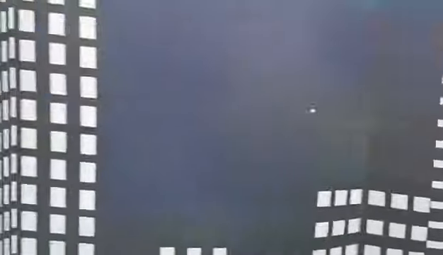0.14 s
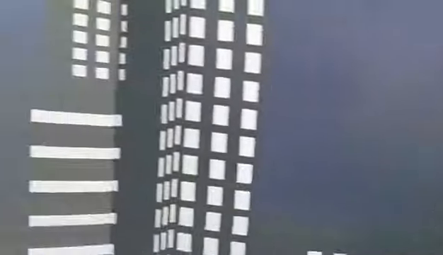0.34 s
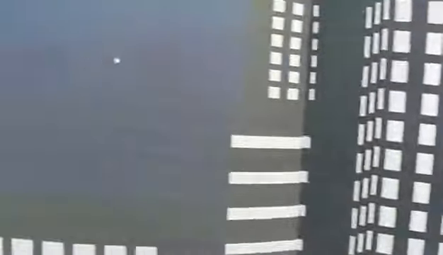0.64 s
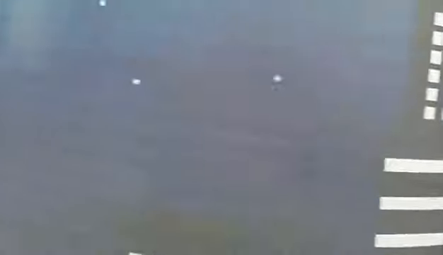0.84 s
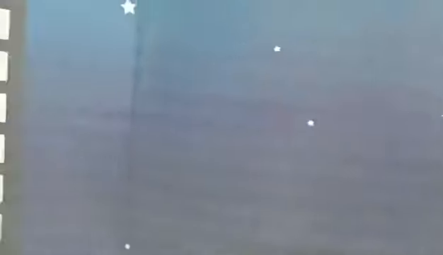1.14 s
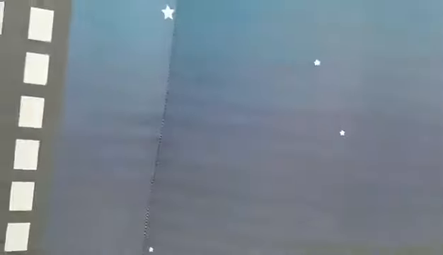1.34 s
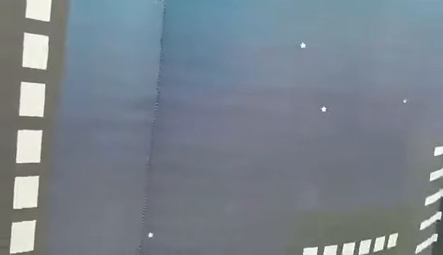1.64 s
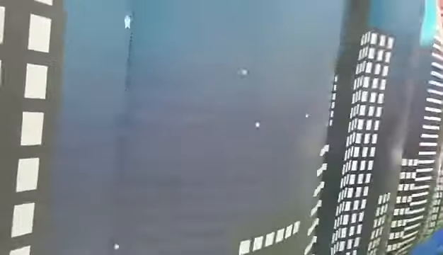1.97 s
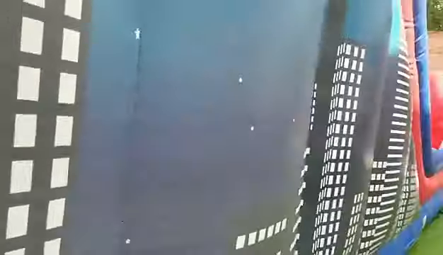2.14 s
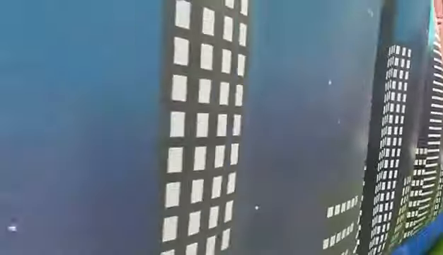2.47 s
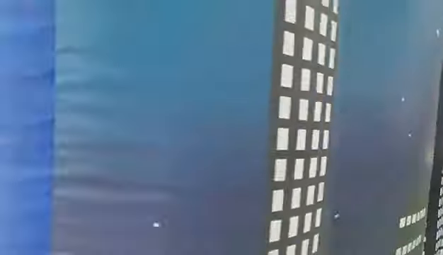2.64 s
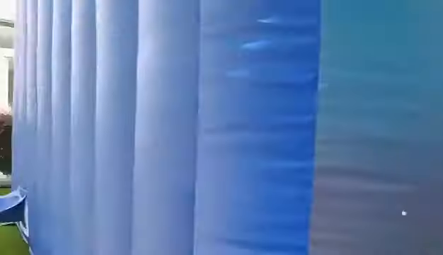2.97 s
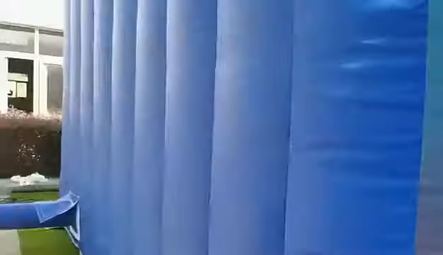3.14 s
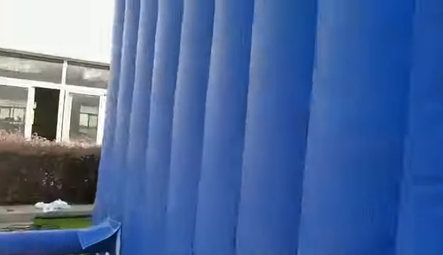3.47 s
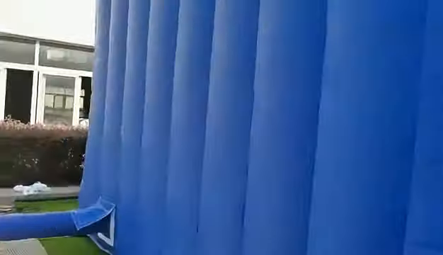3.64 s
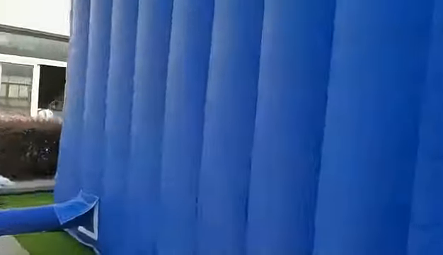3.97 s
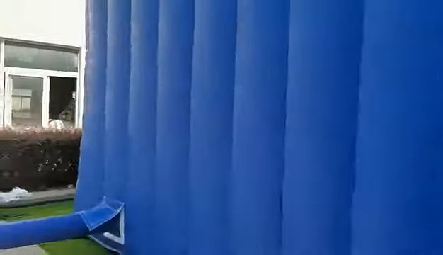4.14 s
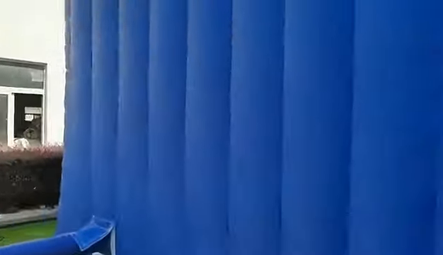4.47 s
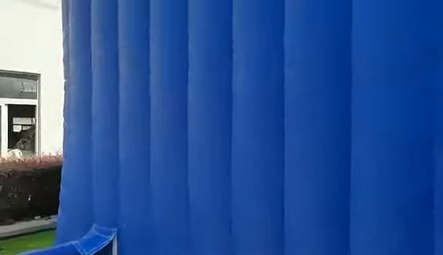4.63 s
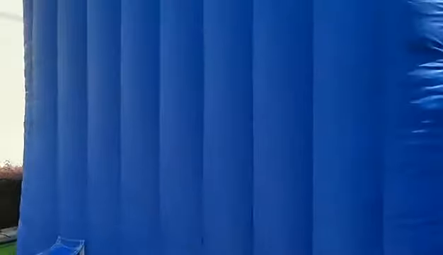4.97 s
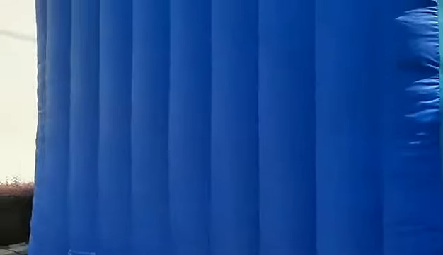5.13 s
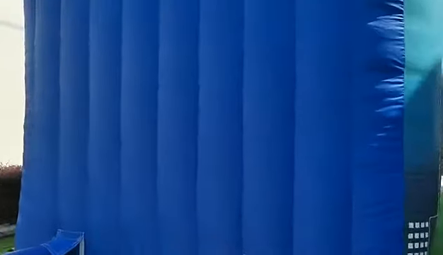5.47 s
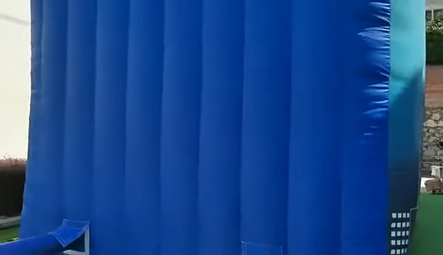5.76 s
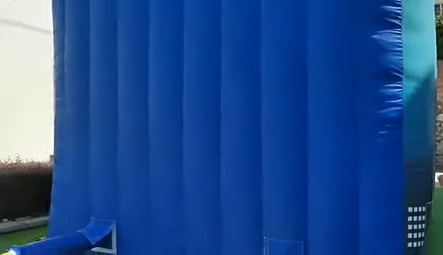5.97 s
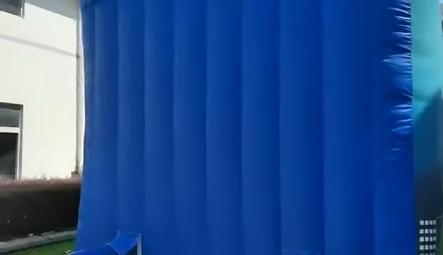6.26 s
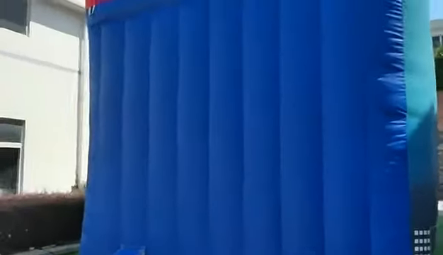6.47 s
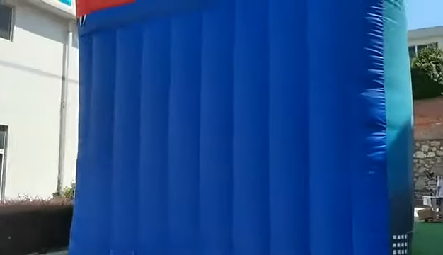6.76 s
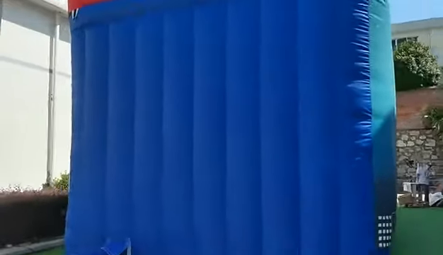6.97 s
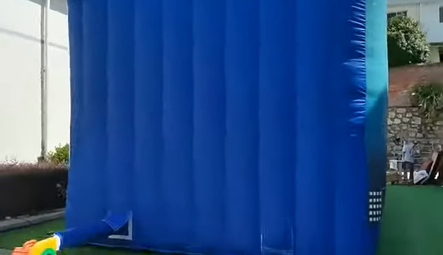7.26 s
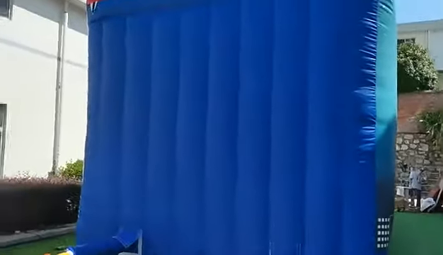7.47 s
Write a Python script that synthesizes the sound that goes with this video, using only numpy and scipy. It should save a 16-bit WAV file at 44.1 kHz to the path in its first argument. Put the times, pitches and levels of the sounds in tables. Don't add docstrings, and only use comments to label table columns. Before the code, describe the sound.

An electric air blower rushes steadily outdoors beside a big inflatable, dull at first, then brighter and hissier, with wind bumping the microphone.

```python
import sys
import numpy as np
from scipy import signal
from scipy.io import wavfile
from scipy.ndimage import map_coordinates

SR = 44100
rng = np.random.default_rng(int(sys.argv[2]) if len(sys.argv) > 2 else 0)


def dump(signal):
    limited = np.clip(np.atleast_2d(signal).T, -1, 1)
    pcm = np.round(limited * 32767).astype(np.int16)
    wavfile.write(sys.argv[1], SR, pcm)


def amplitude_ratio(level_db):
    exponent = np.asarray(level_db, float) / 20
    return 10 ** exponent


N = 335160
STEPS_S = np.arange(1600) / 200

# Hz, hidden 0-1, in sight 0-1.
DIRECT_SHARE = [(108, 0.9, 0.95), (383, 0.93, 0.96), (560, 0.5, 0.75), (820, .85, .7), (1106, 0.5, 0.3),
                (1852, 0.3, 0.8), (2250, .2, 0.8), (3040, .2, .65), (4580, 0.2, 0.15), (7300, 0.03, 0.2)]
LEAD_FROM_HZ = 960
PATCHY_TO_HZ = 2800


def blower(patchy_db, flutter_db):
    s, *_, lead_ms = walk()
    lead_ms = in_time(s, lead_ms)
    edges = np.r_[25 * 2 ** np.arange(0, 3, 1 / 2), 200 * 2 ** np.arange(0, 5.3, 1 / 8)]
    hz, width = np.sqrt(edges[1:] * edges[:-1]), np.diff(edges)
    levels_db, sight = band_levels(hz, width)
    sight = in_time(s, sight)
    share = np.clip(at_hz(DIRECT_SHARE, hz), 0, 1)
    direct_gain, scatter_gain = np.sqrt(share), np.sqrt(1 - share)

    source, scatter = rng.standard_normal((2, N)), rng.standard_normal((2, 2, N))
    arrivals = [np.array([x, delayed(x, lead_ms)]) for x in source]

    patches = drift(0.79, count=2 * len(hz))
    flutter = drift(24.3, count=len(hz))
    surge = drift(5.4, count=1)[0]
    out = np.zeros((2, N))
    for k in range(len(hz)):
        short_wave = hz[k] > LEAD_FROM_HZ
        first = arrivals[k % 2] if short_wave else source[k % 2]
        hidden, seen = direct_gain[:, k]
        hidden_rest, seen_rest = scatter_gain[:, k]
        air = (hidden + (seen - hidden) * sight) * first
        air = air + (hidden_rest + (seen_rest - hidden_rest) * sight) * scatter[k % 2]
        band = bandpass(air, edges[k], edges[k + 1])
        patch_db = patchy_db * min(1, PATCHY_TO_HZ / hz[k])
        for port in (0, 1):
            wobble_db = patch_db * patches[2 * k + port * short_wave]
            wobble_db = wobble_db + flutter_db * (flutter[k] + 0.18 * surge)
            gain = amplitude_ratio(np.interp(STEPS_S, s, levels_db[port, k]) + wobble_db)
            out[port] += in_time(STEPS_S, gain) * band[port]
    return out * np.sqrt(SR / 2 / 1.11), sight, lead_ms


# time in s, nearness to the blower in dB, boom off the fabric wall in dB,
# left port turned towards the blower in dB, left lead in ms.
WALK_PATH = [(0, -4.5, 2.5, -6, 0.05), (.5, -4, 3, -2, 0.13), (.9, -3.5, -2.5, -5, 0.23),
             (1.4, -1.5, 0.5, -4.5, 0.62), (1.9, -2.5, 0, -1.5, 0.54), (2.4, -2.5, -2.5, -2, .43),
             (2.85, -2, 5, -0.5, 0.4), (3.25, -1, 1, 0, 0.36), (3.9, 0, 4, -1, 0.34),
             (4.4, 1, -1.5, 3.5, 0.35), (4.9, 1.5, -1, -1.5, 0.32), (5.4, 0, -1, -0.5, 0.36),
             (5.8, -2.5, 0.5, 1.5, 0.3), (6.3, -2, -1, -0.5, 0.28), (6.8, -5.5, 3, 4, .29),
             (7.25, -5, -0.5, -2.5, 0.29), (7.6, -6, 1, 3.5, 0.29)]


def walk():
    s = np.arange(0, N / SR + .1, .05)
    return s, *along(WALK_PATH, s)


CORNER_S, CORNER_TAKES_S = 1.596, 0.68
LATER_S_PER_OCTAVE, FIRST_HZ = 0.17, 5950


def in_sight(s, hz):
    corner_s = CORNER_S + LATER_S_PER_OCTAVE * np.clip(np.log2(FIRST_HZ / hz), 0, 2)
    return np.sin(np.pi / 2 * np.clip((s - corner_s) / CORNER_TAKES_S + .5, 0, 1)) ** 2


# Hz, hidden left, hidden right, in sight left, in sight right in dB.
PORT_COLOUR = [(24, -23, -36, -23.5, -36), (64.7, -4.5, -11.5, -5.5, -11), (281.6, 2.5, -3.5, -2, -1.5),
               (465.6, -25, -30.5, -16, -18), (753, -25, -21, -16.5, -17), (1090, -14.5, -11.5, -14.5, -13),
               (1543, -18.5, -12.5, -9, -9.5), (2208, -19.5, -9.5, -10.5, -6), (2685, -20, -34, -13, -16),
               (3524, -35.5, -35.5, -17, -21.5), (4158, -24, -20, -14, -14),
               (5424, -36.5, -28.5, -21.5, -17.5), (6965, -28, -26, -13, -13), (7426, -35.5, -32, -20, -21)]
# time in s, ridge in Hz, ridge in dB, top in dB.
PHONE_TILT = [(0, 2180, -1.5, -3.5), (1.3, 2270, 1, -1), (1.9, 2260, -2.5, 2.5), (2.5, 2070, 3.5, 0.5),
              (4.1, 2180, 4, -3.5), (4.8, 2147, 3, 0.5), (5.6, 2196, 8, 3.5), (7.2, 2313, 2.5, 2.5),
              (7.5, 2420, 1, 0)]
RIDGE_WIDTH_HZ, RIDGE_LEFT_SHARE = 110, 0.48
TOP_FROM_HZ, TOP_RIGHT_SHARE = 5400, 0.46
NOTCH_HZ, NOTCH_HZ_PER_DB, NOTCH_WIDTH_HZ, NOTCH_DB = 4750, 86.5, 200, -7.5
# time in s, centre in Hz, left in dB, right in dB.
GROUND_ECHO_DIP = [(0, 560, 2.5, -1.5), (1, 645, -1, 0), (1.7, 798, 1.5, -9.5), (2.3, 708, 0.5, -6),
                   (3, 655, 2.5, -8.5), (3.6, 728, -1, -8), (4.2, 765, -3.5, -7.5), (5.3, 820, -7, 1),
                   (6.2, 853, -2.5, -1), (7, 880, -4, -4.5), (7.6, 790, -0.5, -3)]
# time in s, centre in Hz, left in dB, right in dB.
WALL_ECHO_DIP = [(0, 1250, -3, -3), (1.1, 1033, -7.5, 2), (2.3, 1276, -3.5, -3.5), (3.4, 1392, 0.5, -2.5),
                 (4.4, 1246, -1, -3), (5.1, 1080, -0.5, -8.5), (5.9, 1445, -4, -1), (6.5, 1153, 1, -7),
                 (7.6, 1150, -1, -3.5)]
# time in s, duration in s, from Hz, to Hz, level in dB.
RIGHT_SHADE = (3.5, 4.5, 4396, 5702, -7)
# time in s, duration in s, from Hz, to Hz, level in dB.
LAST_SWING = (7.36, 0.084, 2200, 5500, 6)
RUSH_EDGES_HZ = [25, 420, 1500, 2900, 7800]
# hidden in dB, in sight in dB, share of nearness, share of boom (0-1).
RUSH_PARTS = [
    (-32, -29.5, .6, 0.87),
    (-37, -34, .25, .5),
    (-31.5, -26, 0.9, 0.077),
    (-41.5, -29.5, 0.46, 0.021),
]
# hidden in dB, in sight in dB, share of turning (0-1).
RUSH_BALANCES = [
    (2.2, 2.5, 0.035),
    (-1.2, -0.6, 0.037),
    (-2, -3.5, 0.79),
    (-2.5, 0.5, 0.48),
]


def band_levels(hz, width):
    s, near_db, boom_db, turning_db, _ = walk()
    rows = hz[:, None]
    sight = in_sight(s, rows)
    colour = at_hz(PORT_COLOUR, hz)[..., None]
    shape = colour[:2] * (1 - sight) + colour[2:] * sight

    ridge_hz, ridge_db, top_db = along(PHONE_TILT, s)
    ridge_bell = np.exp(-.5 * ((rows - ridge_hz) / RIDGE_WIDTH_HZ) ** 2)
    shape += np.outer([RIDGE_LEFT_SHARE, 1], ridge_db)[:, None] * ridge_bell
    shape += np.outer([1, TOP_RIGHT_SHARE], top_db)[:, None] / (1 + (TOP_FROM_HZ / rows) ** 20)
    notch_hz = NOTCH_HZ + NOTCH_HZ_PER_DB * top_db
    shape[1] += NOTCH_DB * np.exp(-.5 * ((rows - notch_hz) / NOTCH_WIDTH_HZ) ** 2)
    shape += sliding_dip(GROUND_ECHO_DIP, s, hz) + sliding_dip(WALL_ECHO_DIP, s, hz)
    shape[1] += opening(RIGHT_SHADE, s, hz)

    for part, balance, low, high in zip(RUSH_PARTS, RUSH_BALANCES, RUSH_EDGES_HZ, RUSH_EDGES_HZ[1:]):
        seen = in_sight(s, np.sqrt(low * high))
        level_db = part[0] * (1 - seen) + part[1] * seen + part[2] * near_db + part[3] * boom_db
        pan_db = balance[0] * (1 - seen) + balance[1] * seen + balance[2] * turning_db
        inside = (hz > low) & (hz <= high)
        power = np.sum(amplitude_ratio(shape[:, inside]) ** 2 * width[inside, None], axis=1)
        left_db = level_db + 10 * np.log10(2 / (1 + amplitude_ratio(-pan_db) ** 2))
        shape[:, inside] += (np.array([left_db, left_db - pan_db]) - 10 * np.log10(power))[:, None]
    shape[1] += opening(LAST_SWING, s, hz)
    shape += crests(s, hz)
    return shape, in_sight(s, FIRST_HZ)


def sliding_dip(table, s, hz):
    centre_hz, left_db, right_db = along(table, s)
    octaves = np.log2(hz[:, None] / centre_hz)
    return np.array([left_db, right_db])[:, None] * np.exp(-.5 * (octaves / 0.16) ** 2)


def opening(move, s, hz):
    at, takes, low_hz, high_hz, db = move
    progress = np.clip((s - at) / takes + .5, 0, 1)
    return db * progress / (1 + (low_hz / hz[:, None]) ** 20) / (1 + (hz[:, None] / high_hz) ** 20)


# time in s, half length in s, centre in Hz,
# left in dB, right in dB.
BAND_CRESTS = [(0.19, 0.39, 120, -0.5, -6.5), (.65, 0.22, 360, 5.5, 5), (.7, .25, 600, 4, 2),
               (1, 0.16, 790, -3.5, -6), (.7, .3, 1360, -6.5, 0), (0.24, 0.39, 1470, 3, 5),
               (1.7, .4, 520, -6.5, 2), (1.95, .35, 860, 2, -6.5), (2.3, .4, 370, 4.5, 5),
               (2.35, .35, 1050, 0, 3), (3.1, .15, 490, -5.5, -5.5), (3.5, 0.068, 210, 1.5, 1),
               (3.05, .15, 450, -4.5, -2), (3.25, .2, 280, -5, -5), (3.5, .12, 190, -3, -3),
               (3.75, .3, 330, 4.5, 3.5), (4, .12, 290, 4.5, 2.5), (4.1, 0.18, 450, -6.5, -2),
               (4.8, .3, 200, 7.5, 5), (4.55, .3, 630, -4, -6.5), (4.65, .3, 800, 5.5, 5.5),
               (4.2, .3, 1000, 1.5, 4), (4, 0.28, 1140, -3.5, -4.5), (3.8, .3, 1430, 3.5, 2),
               (4.9, .35, 320, -5.5, -3.5), (5.1, 0.51, 490, 5, 1), (5.5, .35, 950, -3, -4.5),
               (5.4, 0.15, 1240, 4, 5), (5.4, 0.34, 320, -3, -3), (6.3, .5, 1070, 0, -5),
               (6.4, .3, 490, 6.5, 1), (6.5, .35, 1310, 4, 2), (7.7, 0.21, 900, 3, 3.5),
               (7.3, .35, 490, 5, 4), (6.8, 0.25, 790, -5.5, -2), (6.3, 0.49, 230, 3.5, 3),
               (1.8, 0.39, 4700, 1.5, 3), (6.2, 0.35, 1850, 2.5, 2.5), (5, 0.27, 6500, -1.5, -3),
               (6.3, 0.54, 4500, -2.5, -3.5)]
CREST_WIDTH_OCTAVES = .12


def crests(s, hz):
    total = 0
    for at, half, centre_hz, left_db, right_db in BAND_CRESTS:
        octaves = np.log2(hz[:, None] / centre_hz)
        bell = np.exp(-(octaves / CREST_WIDTH_OCTAVES) ** 2 / 2 - ((s - at) / half) ** 2)
        total = total + np.array([left_db, right_db])[:, None, None] * bell
    return total


# time in s, half length in s, centre in Hz, width in Hz, share cancelled in the sum.
OPPOSED_BANDS = [(0.64, 0.28, 3800, 310, 0.56), (0.26, .35, 2750, 420, 0.43), (1.3, .1, 3250, 220, .7),
                 (1.8, 0.22, 3550, 300, 0.73), (1.6, 0.14, 2700, 170, 0.62), (2.1, 0.062, 4400, 200, 0.58),
                 (1.4, 0.071, 6200, 250, 0.52), (2.3, 0.27, 3550, 400, 0.59), (2.25, 0.18, 2720, 190, 0.9),
                 (2.13, .07, 5030, 230, 0.6), (2.8, 0.36, 4750, 240, .5), (2.2, 0.34, 620, 200, 0.72),
                 (3, .15, 490, 120, 0.78), (3.25, .25, 3400, 340, 0.58), (3.8, 0.31, 3560, 280, 0.98),
                 (3.9, 0.26, 560, 120, 0.74), (4.8, 0.16, 1500, 200, .3), (5.2, .11, 1730, 220, .75),
                 (4.98, 0.033, 1750, 360, 0.69), (7.2, .2, 1720, 200, 0.25), (3.7, .1, 1750, 200, 0.72),
                 (6.2, 0.55, 1800, 400, -0.41), (5.3, 0.37, 1000, 100, 0.33), (5.97, 0.074, 2900, 220, .7),
                 (7.8, 0.14, 2700, 200, .5), (7.23, .08, 3000, 230, 0.68), (4.9, 0.31, 3830, 200, 0.49),
                 (6.4, .15, 3300, 230, .6), (6.25, 0.22, 3760, 240, 0.55), (7.1, 0.61, 4200, 200, .65),
                 (4.48, 0.046, 5600, 360, .8), (5.27, .06, 1650, 360, .8), (5.45, .05, 1600, 280, .7),
                 (3.8, .04, 1650, 400, 0.62), (6.4, .05, 1650, 450, .7), (2.75, 0.12, 590, 140, .8),
                 (1.45, .15, 580, 120, .7), (7.4, .3, 1500, 370, 0.048), (5.3, .5, 1300, 230, -0.43),
                 (3.1, 0.82, 4250, 360, -0.54), (6.5, .75, 4250, 380, -0.21), (3.2, .3, 1050, 350, -0.52)]
OPPOSED_KEEPS = 0.42
TREMBLE_PER_S, TREMBLE_SHARE = 9, .3


def opposed(x):
    both, apart = (x[0] + x[1]) / 2, (x[0] - x[1]) / 2
    trembles = np.clip(.85 + TREMBLE_SHARE * drift(TREMBLE_PER_S, count=len(OPPOSED_BANDS)), 0, 1.1)
    for (at, half, hz, width_hz, share), tremble in zip(OPPOSED_BANDS, trembles):
        near = slice(max(0, int((at - 2 * half) * SR)), int((at + 2 * half) * SR))
        edges = [hz - width_hz / 2, hz + width_hz / 2]
        sos = signal.butter(2, edges, "band", fs=SR, output="sos")
        band = signal.sosfiltfilt(sos, [both[near], apart[near]])
        band = band * np.clip(share, -1, 1) * (swell(at, half) * in_time(STEPS_S, tremble))[near]
        both[near] -= band[0]
        apart[near] += OPPOSED_KEEPS * band[1]
    return np.array([both + apart, both - apart])


BLADE_HZ, BLADE_DB = 1066, -47


def blades(sight, lead_ms):
    waver = in_time(STEPS_S, drift(4, count=1)[0])
    phase = 2 * np.pi * BLADE_HZ * np.arange(N) / SR + 1.2 * waver[::-1]
    tone = np.sqrt(2) * np.sin(phase) * amplitude_ratio(BLADE_DB + 2.9 * waver)
    return np.array([tone, delayed(tone, lead_ms)]) * (.25 + .75 * sight)


# centre in Hz, width in Hz, level in dB, loudest at s, half length in s.
CASING_RINGS = [
    (2130, 130, -38.5, 3.6, .9),
    (2205, 120, -37, 5.1, .9),
    (2244, 120, -41.5, 6.6, .9),
    (4220, 250, -43, 6, 1.6),
    (4670, 250, -46, 1.75, .3),
    (271, 91, -33, 2.72, .14),
    (200, 65, -33.5, 4.45, .15),
    (120, 58, -33, 2.38, .08),
    (290, 76, -34.5, 3.98, 0.064),
]
RING_LEFT_DB = -3


def casing():
    rings = 0
    for hz, width_hz, db, at, half in CASING_RINGS:
        ring = bandpass(rng.standard_normal(N), hz - width_hz / 2, hz + width_hz / 2)
        rings = rings + amplitude_ratio(db) * swell(at, half) * rms_one(ring)
    return rings * amplitude_ratio(np.array([[RING_LEFT_DB], [0]]))


# frequency in Hz, level in dB, loudest at s, half length in s.
MOTOR_HUM = [
    (250, -42, 4.6, 1.),
    (250, -45, 1.4, .6),
    (300, -41, 2.5, .45),
    (300, -41, 4.2, .55),
    (400, -48, 3.3, 1.1),
    (400, -51, 5.4, .3),
]


def hum():
    total = 0
    for (hz, db, at, half), waver in zip(MOTOR_HUM, drift(2.2, count=len(MOTOR_HUM))):
        phase = 2 * np.pi * hz * np.arange(N) / SR + in_time(STEPS_S, waver[::-1])
        level = amplitude_ratio(db + 2.0 * in_time(STEPS_S, waver)) * (0.17 + swell(at, half))
        total = total + np.sqrt(2) * np.sin(phase) * level
    return total


def wind():
    lumps = amplitude_ratio(1.5 * in_time(STEPS_S, drift(9, count=1)[0]))
    low = bandpass(rng.standard_normal((2, N)), 42, 150)
    return rms_one(low * lumps) * gusts() * amplitude_ratio(np.array([[0], [-18.0]]))


# time in s, peak in dB, half width in s.
WIND_GUSTS = [(.22, -38.5, 0.1), (.9, -37, 0.21), (1.26, -34, 0.089), (1.801, -35.5, 0.42),
              (2.47, -24, 0.29), (2.8, -27, 0.061), (2.999, -24.5, 0.035), (3.269, -27, .17),
              (3.62, -31, 0.14), (4.299, -43, 0.14), (5.001, -31, 0.062), (5.39, -28.5, 0.043),
              (5.729, -30, 0.14), (6.278, -29, 0.04), (6.701, -40, 0.16), (7.27, -34.5, 0.22),
              (7.6, -27.5, 0.074)]
CALM_DB = -44


def gusts():
    swells = sum(amplitude_ratio(db) * np.exp(-((STEPS_S - at) / half) ** 2) for at, db, half in WIND_GUSTS)
    return in_time(STEPS_S, amplitude_ratio(CALM_DB) + swells)


def rms_one(x):
    return x / np.sqrt(np.mean(x ** 2) + 1e-20)


def bandpass(x, low_hz, high_hz):
    return signal.sosfilt(signal.butter(2, [low_hz, high_hz], "band", fs=SR, output="sos"), x)


def in_time(s, values):
    return np.interp(np.arange(N) / SR, s, values)


def along(table, s):
    at, *columns = np.transpose(table)
    return [np.interp(s, at, c) for c in columns]


def at_hz(table, hz):
    f, *columns = np.transpose(table)
    return np.array([np.interp(np.log(hz), np.log(f), c) for c in columns])


def swell(at, half):
    return np.exp(-((np.arange(N) / SR - at) / half) ** 4)


def drift(rate_hz, count):
    r = np.exp(-2 * np.pi * rate_hz / 200)
    slow = signal.lfilter([1], [1, -2 * r, r * r], rng.standard_normal((count, 2000)))[:, 400:]
    return slow / slow.std(axis=1, keepdims=True)


def delayed(x, ms):
    return map_coordinates(x, [np.arange(N) - ms * SR / 1000], order=3, mode="wrap")


def scene():
    rush, sight, lead_ms = blower(patchy_db=1.5, flutter_db=1.69)
    return opposed(rush) + blades(sight, lead_ms) + casing() + hum() + wind()


def band_limit(x):
    return signal.sosfilt(signal.butter(12, 7640, fs=SR, output="sos"), x)


def record(dry):
    mix = amplitude_ratio(1.1) * dry
    return band_limit(mix)


dry = scene()
out = record(dry)
dump(out)
```